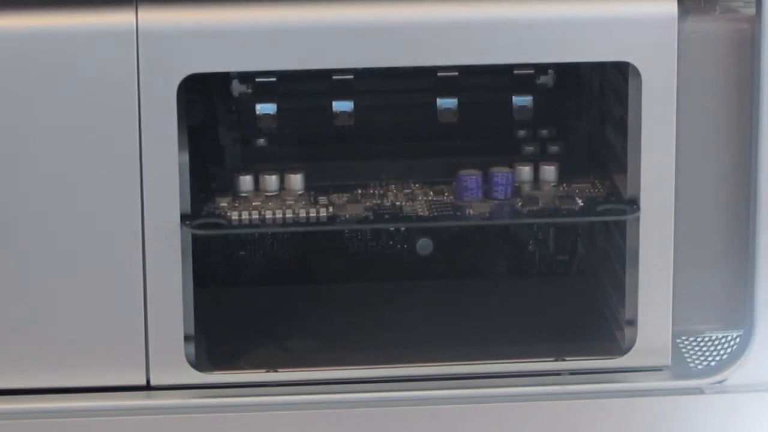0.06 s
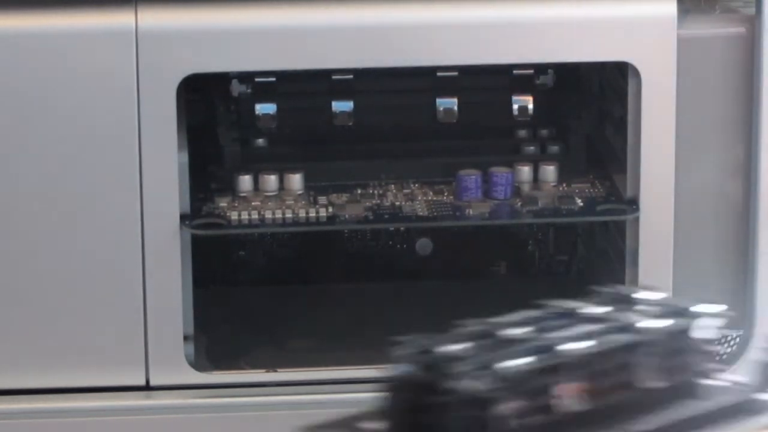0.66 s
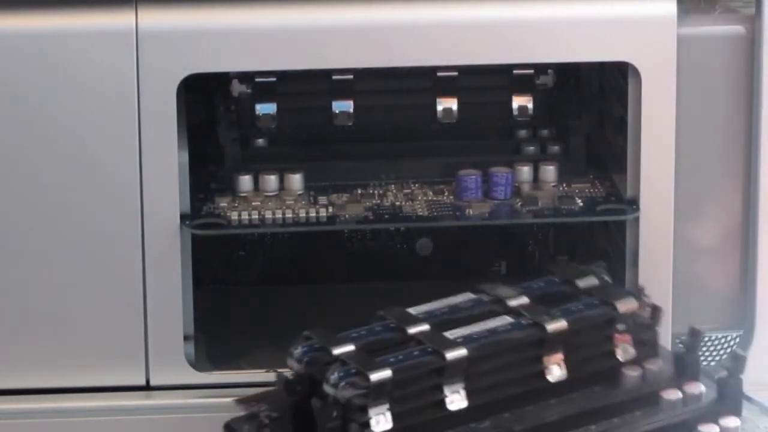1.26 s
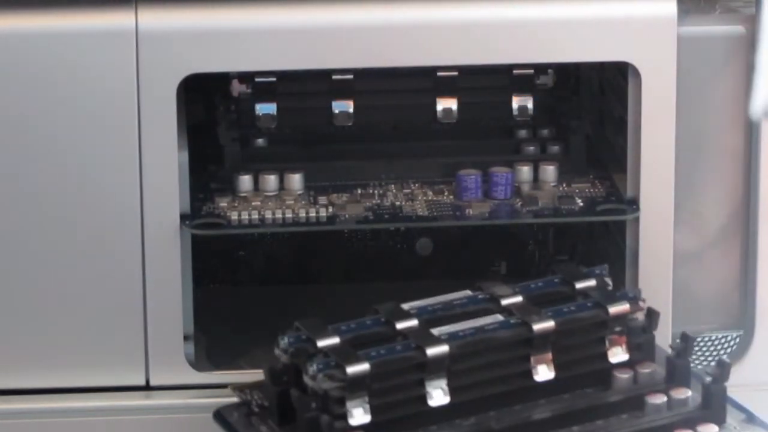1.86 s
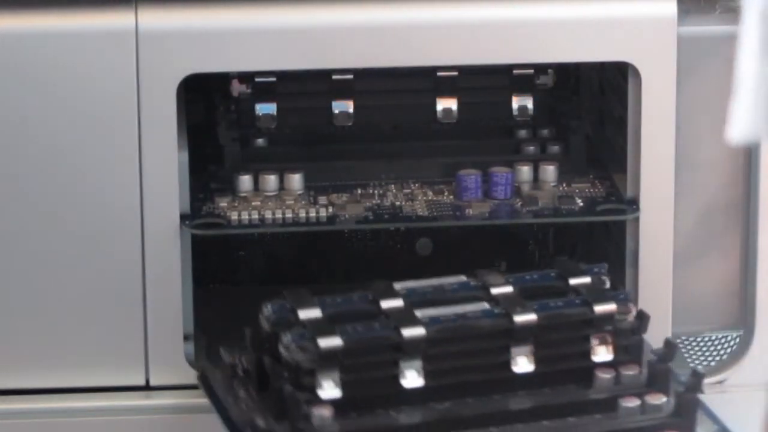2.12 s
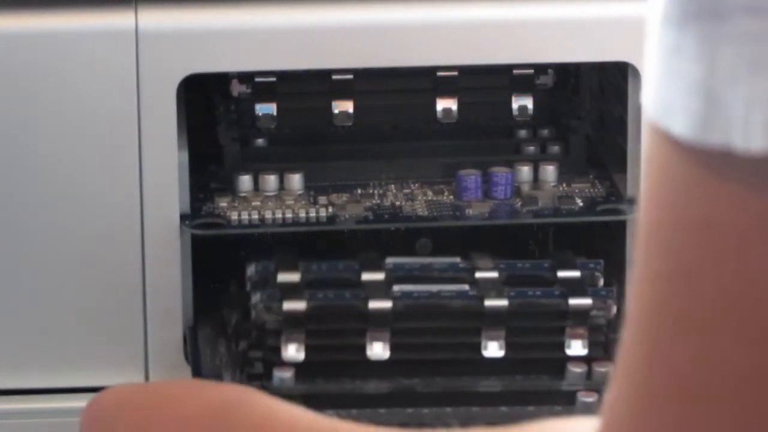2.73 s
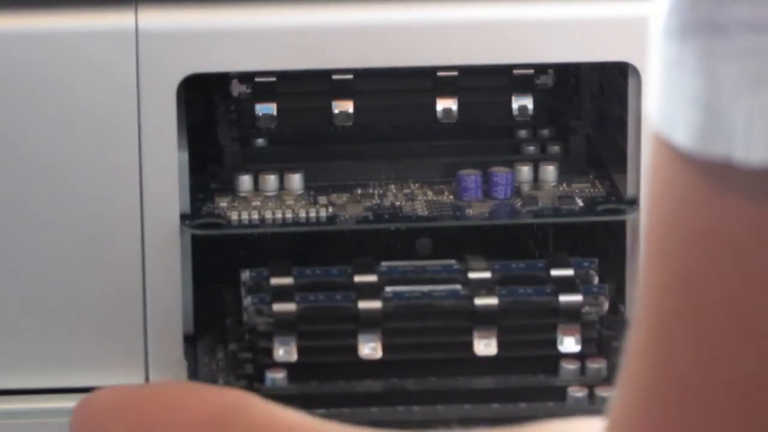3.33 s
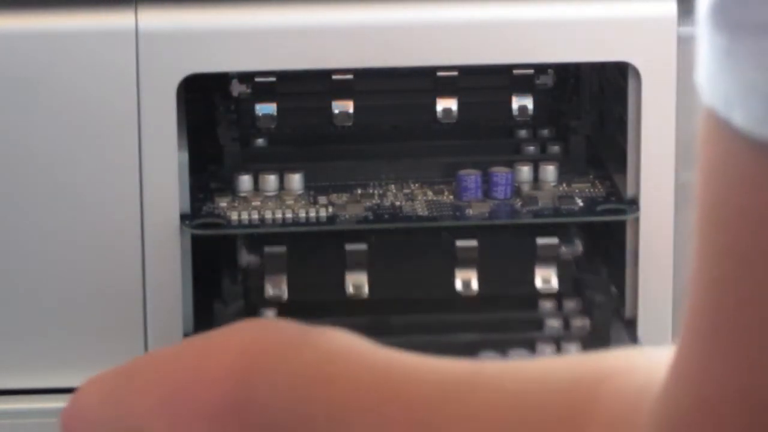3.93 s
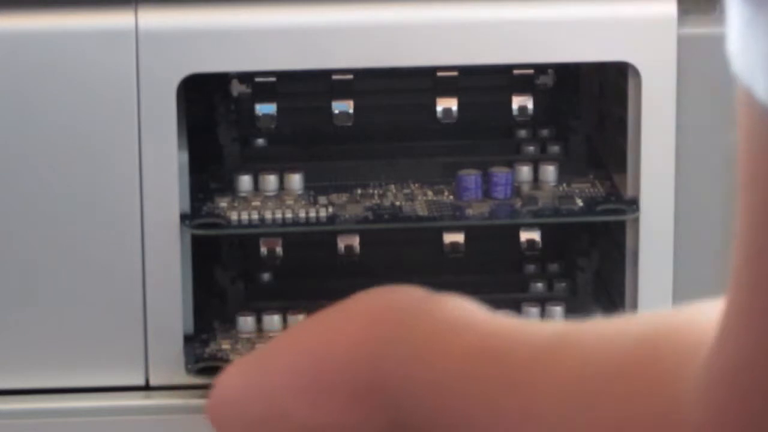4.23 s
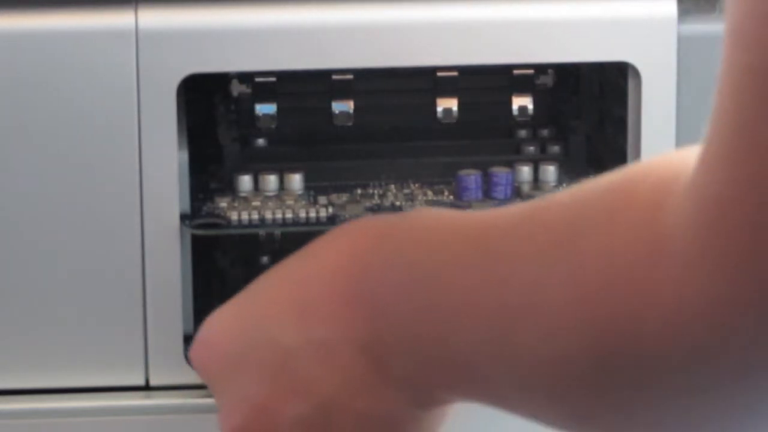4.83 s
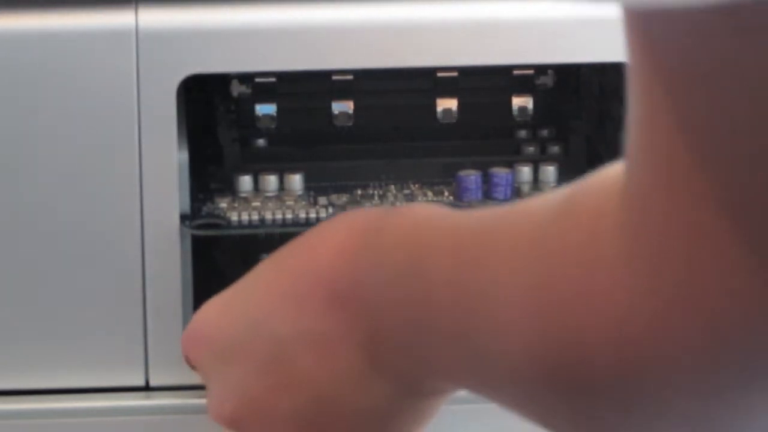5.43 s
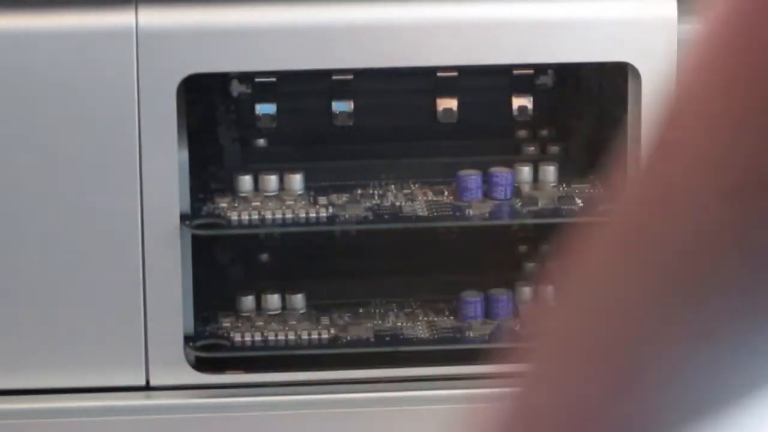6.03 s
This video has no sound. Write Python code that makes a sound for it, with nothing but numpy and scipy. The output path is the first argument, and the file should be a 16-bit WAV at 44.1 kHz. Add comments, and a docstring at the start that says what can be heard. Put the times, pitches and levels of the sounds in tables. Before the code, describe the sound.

Faint bumps and ticks, then firm metallic scrapes and several hard knocks as a memory card slides into a desktop computer, over soft fan noise.

```python
"""Soft room air, a fan's whirr and mains hum come first, then faint scrapes and bumps as a memory riser
card is lifted into the metal cage of a desktop computer. Its steel clips tick, its edge slips over tiny
ridges on the guide rails, firm pushes make the metal sing and squeak, and it seats with heavy knocks.
Board, cage, thin sheet metal, clips and rails ring under every contact, in a small room."""
import sys
import numpy as np
from scipy import signal
from scipy.fft import rfft, irfft, next_fast_len
from scipy.io import wavfile
from scipy.ndimage import map_coordinates

SR = 44100
rng = np.random.default_rng(int(sys.argv[2]) if len(sys.argv) > 2 else 0)


def waveform_to_disk(signal):
    """Save audio, clipped to [-1, 1], as 16-bit WAV at the path in sys.argv[1]."""
    frames = np.transpose(np.atleast_2d(signal))
    scaled = np.clip(frames, -1, 1) * 32767
    samples = np.round(scaled).astype(np.int16)
    wavfile.write(sys.argv[1], SR, samples)


N = 267907

# room tone fader: (time [s], level [dB])
AIR_LEVEL = [(0, -52.5), (.16, -57.5), (2.2, -59.5), (3.5, -61), (4.3, -56), (6.07, -56.5)]
# room tone colour: (frequency [Hz], mid shape [dB], side shape [dB])
AIR_SPECTRUM = [(28, -32, -50), (60, -24.5, -28), (133, -14.5, -14.5), (282, -7.5, -8), (457, -8.5, -9),
                (604, -6.5, -4.5), (623, -8.5, -19), (960, -7.5, -11), (1350, -9, -11), (2940, -18, -23),
                (4230, -25, -33.5), (9200, -26, -34.5), (11900, -33, -38.5), (15100, -36, -49)]
# fan whirr: (pitch [Hz], nominal width [Hz], mid level [dB], side level [dB])
FAN_WHIRR = [(813.7, 25.7, -63.5, -59), (2820, 22, -80, -80)]

# sliding pushes: (full pressure at [s], hold [s], release [s], cage [dB], sheet [dB], clips [dB],
# rail before its lift [dB], edge [dB])
STROKES = [(0.618, .005, 0.036, -70, -55, -68, -65, -85), (0.767, 0.015, 0.032, -52, -46.5, -58, -61, -83),
           (2.812, 0.0067, 0.033, -49.5, -52.5, -59, -58, -69),
           (3.43, 0.05, 0.03, -49.5, -49.5, -58.5, -56, -76),
           (3.9, 0.046, 0.28, -40, -39.5, -68, -49.5, -65), (4.093, 0.023, 0.033, -76, -82, -74, -69, -79),
           (4.439, 0.13, 0.045, -44, -47, -69, -49.5, -65), (4.846, 0.044, .06, -73, -67, -76, -59, -63),
           (5.368, 0.05, 0.033, -40.5, -52, -60, -71, -85),
           (5.836, 0.08, 0.13, -58, -61.5, -71, -69.5, -82),
           (6.045, 0.0073, 0.032, -61, -55, -63, -63, -74)]
# ringing parts: (low [Hz], high [Hz], tail t60 [s], tail [dB], side re tail [dB], quick echoes [dB])
BOARD = (206, 465, 0.32, -1, -30, 4)
CAGE = (470, 1335, 0.315, -4.5, -15.5, -0.5)
SHEET = (1240, 2906, 0.2452, 4, -9, 5)
CLIPS = (3005, 3757, -0.25, 2.5, -15, 13)  # negative t60: this tail swells and cuts off, like a late echo
RAIL = (4598, 12096, 0.33, 1.5, -1, 8.5)
EDGE = (12300, 16500, 0.08, 2, 0, 3)
# resonances of card and cage: (pitch [Hz], width [Hz], peak re the dense bed [dB])
RESONANCES = [(270.3, 9.4, -5), (342, 18, 2.5), (380, 47, 5), (464, 24, 2.5), (522, 22, 9), (577.3, 30, 12),
              (758, 66, 6), (854, 27, 4.5), (946, 20, 7), (1018, 45, 3.5), (1220, 180, 0.5), (1402, 12, 4),
              (1700, 61, 1), (1940, 24, -2), (2140, 13, -13.5), (2560, 72, -6.5), (4720, 2900, 1)]

# the board bumps on opening and guides: (time [s], chatter [s], level [dB], hardness [dB/octave],
# bending re board [dB])
BUMPS = [(1.372, 0.019, -45.5, 0, 0), (1.404, 0.014, -52, -0.5, -4), (1.764, 0.011, -55, 1, 5),
         (1.825, 0.025, -50.5, 1.3, 8.5), (1.862, 0.0082, -66, -1, 1), (2.54, 0.023, -54.5, 0, 7.5),
         (2.765, 0.012, -71.5, -10, 6.5), (2.886, 0.028, -58, 0, 7.5), (3.057, 0.0049, -63, 0, 2.5),
         (3.238, 0.014, -70.5, -6.5, 0.5), (3.866, 0.017, -48, 2, 13.5), (4.858, 0.02, -55, -1, -19),
         (4.982, 0.0049, -75.5, -15, -12), (5.508, 0.0064, -50.5, -6.5, -2.5)]
# steel clips tick on the cage: (time [s], chatter [s], level [dB], hardness [dB/octave])
CLIP_TICKS = [(1.926, 0.016, -60.5, 0), (3.065, 0.0023, -82, 7.5), (3.091, 0.0016, -62.5, -1),
              (3.113, 0.01, -59, -4), (4.695, 0.029, -64.5, 3.5), (5.015, 0.0018, -104, 15),
              (5.133, 0.0015, -62, -1), (5.309, 0.004, -55.5, -3), (5.943, 0.013, -53, -1.5)]
# the card grazes a stop, strikes and rebounds: (time [s], chatter [s], level [dB], hardness [dB/octave],
# board trim [dB], panel re level [dB], graze lead [s], graze level [dB], graze hardness [dB/octave],
# rebound delay [s], rebound re level [dB])
KNOCKS = [(3.7505, 0.0036, -32, -2.5, -10, 8, .0085, -36.5, 2, 0.0165, -3),
          (4.371, 0.0055, -33, -0.5, -22, 2, 0.0085, -37.5, 0.06, .015, -11),
          (4.5445, 0.00036, -23.5, -0.5, 4, -5, 0.0019, -37.5, 2, 0.032, -15.5),
          (5.372, 0.0017, -31, 1, 0, 6, .007, -37, 0, .005, -23),
          (5.4703, 0.0004, -21.5, 2.5, 1, 0.5, 0.018, -36, 2, 0.0054, -17)]
# hit voicings, re the cage: (tilt in a part [dB/octave], board [dB], sheet [dB], clips [dB], rail [dB])
BUMP_MIX = (-2, 2, -2, -8.5, -12)
TICK_MIX = (2.5, -12.5, 2.5, -7, -4)
GRAZE_MIX = (-5.5, -3, -4, -25, -13)
BLOW_MIX = (-3.5, -7, -7, -48, -48)
# trims on the dense ring of a hit: (board [dB], cage [dB], sheet [dB], clips [dB], rail [dB])
PART_TRIM_DB = (-13, -12, -12.5, -18, -13)
# bending modes of the card: (pitch [Hz], t60 [s], trim [dB])
FLEX_MODES = [(153.5, 0.2, -14.5), (266.5, 0.15, 4.5), (384, 0.13, -2.5)]

# the metal sings under firm pushes, and after the knock at 3.75 s and the graze at 5.46 s: # (full strength at
# [s], hold [s], release [s], swell [s], drone [dB], # sheet [dB], rail [dB], rail pitch [Hz], whistle [dB],
# zing [dB])
SINGING_SPELLS = [(3.432, .045, .05, .06, -61, -59, -60, 5000, -71, -56.5),
                  (3.753, .012, .07, .007, -62, -50, -55, 5280, -69, -59.5),
                  (3.92, .045, .1, .05, -47.5, -52, -58.5, 4740, -51.5, -56),
                  (4.44, .1, .025, .05, -44, -53.5, -56.5, 4860, -62, -56),
                  (5.456, .007, .03, .004, -70, -66, -68, 5280, -53, -54)]
# singing modes of panel, sheet and rail: (pitch [Hz], noise width [Hz], trim [dB])
PANEL_DRONE = [(537, 50, -1), (395, 60, -4.5), (797, 60, -7)]
SHEET_RING = [(1432, 30, -1), (1960, 50, -6), (2530, 70, -5), (2675, 60, -1), (2890, 70, -7),
              (3500, 70, -10)]
RAIL_WHISTLE = [(8020, 200, -6), (8700, 150, 0)]
RAIL_ZING = [(10270, 120, 0), (9950, 250, -9)]
# rail modes tuned by each push: (multiple of rail pitch [ratio], noise width [Hz], trim [dB])
RAIL_RING = [(1, 140, 0), (1.12, 220, -5)]
# reverb on singing and bending: (tail t60 [s], tail [dB], side re tail [dB], quick echoes [dB])
SING_REVERB = (0.25, -7, 0, -6)
# a rail squeaks under the long push: (peak at [s], release [s], level [dB], pitch [Hz], jitter [0-1])
SQUEAKS = [(3.94, 0.096, -41, 979, .12), (4.005, 0.06, -34.5, 846, 0.01)]
# dips in the master EQ: (centre [Hz], width [Hz], depth [0-1])
TREBLE_HOLLOWS = [(4110, 700, 0.37), (6570, 1410, 0.59)]

ENTRY_S = (3.3, 4.8)  # the card bends while it enters the guides; after that they hold it
RING_SAMPLES = 24000


def amp(db):
    """Decibels to gain."""
    return 10 ** (np.asarray(db) / 20)


def unit(x):
    """Scale to rms 1."""
    return x / np.sqrt(np.mean(x ** 2) + 1e-20)


def wobble(rate):
    """A smooth random curve, rate knots a second."""
    knots = rng.standard_normal(int(N * rate / SR) + 4)
    return map_coordinates(knots, [np.arange(N) * rate / SR], order=1)


def filtered(x, response):
    """Shape x with a complex frequency response."""
    n = x.shape[-1]
    size = next_fast_len(n + 8192, True)
    return irfft(rfft(x, size) * response(np.fft.rfftfreq(size, 1 / SR)), size)[..., :n]


def resonance(f, hz, width):
    """Response of one damped mode."""
    return 1j * f * width / (hz * hz - f * f + 1j * f * width)


def coloured(hz, db):
    """Noise of rms 1 through an EQ curve."""
    curve = lambda f: amp(np.interp(np.log(f + 1), np.log(hz), db))
    return unit(filtered(rng.standard_normal(N), curve))


def room_tone(side_db=4, hum_hz=100, hum_db=-83):
    """The bed: soft air noise, mains hum and a fan's narrow whirr."""
    t = np.arange(N) / SR
    air = amp(np.interp(t, *np.transpose(AIR_LEVEL)))
    bands, mid_shape, side_shape = np.transpose(AIR_SPECTRUM)
    hum = amp(hum_db) * np.sqrt(2) * np.sin(2 * np.pi * hum_hz * t)
    mid = air * coloured(bands, mid_shape) + hum
    side = air * amp(side_db) * coloured(bands, side_shape)
    for hz, width, fan_mid_db, fan_side_db in FAN_WHIRR:
        whirr = filtered(rng.standard_normal((2, N)), lambda f: resonance(f, hz, width * 2) ** 2)
        mid += amp(fan_mid_db) * unit(whirr[0])
        side += amp(fan_side_db) * unit(whirr[1])
    return np.array([mid + side, mid - side])


def pressure(start, hold, release, swell=0.038):
    """Envelope of a push: up 20 dB per swell time, a hold, then down 20 dB per release time."""
    t = np.arange(N) / SR - start
    return amp(20 * np.minimum(0, np.minimum(t / swell, (hold - t) / release)))


def ringing(force, part):
    """Force rings one part: strong resonances stand on a bed of dense modes."""
    band = signal.butter(3, part[:2], "band", fs=SR, output="sos")
    modes = lambda f: 1 + sum(amp(db) * resonance(f, hz, width) for hz, width, db in RESONANCES)
    return signal.sosfilt(band, filtered(force, modes))


def reverb(part, case_t60=0.02, case_side_db=-15):
    """Stereo response: direct sound, quick echoes in the case, then the tail of case and room."""
    t60, tail_db, side_db, case_db = part[-4:]
    t = np.arange(RING_SAMPLES) / SR
    noise = rng.standard_normal((2, 2, RING_SAMPLES))
    echoes = unit(noise[0] * amp(-60 * t / case_t60) * (1 - np.exp(-t / 0.0025)))
    echoes *= amp([[case_db], [case_db + case_side_db]])
    tail = unit(noise[1] * amp(-60 * t / t60) * (1 - np.exp(-t / 0.002)))
    tail *= amp([[tail_db], [tail_db + side_db]])
    mid, side = (echoes + tail) / np.sqrt(RING_SAMPLES)
    mid[0] += 1
    return np.array([mid + side, mid - side])


def in_case(vibration, part):
    """Send a sustained sound through a reverb of unit energy."""
    response = unit(reverb(part)) / np.sqrt(RING_SAMPLES)
    return signal.fftconvolve(vibration[None], response, axes=1)[:, :N]


def scrapes(slips_per_s=7000, spread_db=3.5, judder_db=2, board_db=-11, rail_lift_db=2, flex_db=4):
    """The card's edge catches on tiny ridges; the slips ring every part, under the singing metal."""
    catches = rng.random(N) < slips_per_s / SR
    slips = catches * rng.standard_normal(N) * amp(spread_db * rng.standard_normal(N))
    slips *= amp(judder_db * wobble(200))
    cage, sheet, clips, rail, edge = sum(amp(levels)[:, None] * pressure(s, hold, release)
                                         for s, hold, release, *levels in STROKES)
    board = cage * amp(board_db)
    t = np.arange(N) / SR
    entering = (t > ENTRY_S[0]) & (t < ENTRY_S[1])
    flex = unit(filtered(slips, lambda f: resonance(f, hz=266, width=11)))
    bending = board * amp(flex_db) * flex * entering
    pushes = ((BOARD, board), (CAGE, cage), (SHEET, sheet), (CLIPS, clips),
              (RAIL, rail * amp(rail_lift_db)), (EDGE, edge))
    rasp = sum(in_case(push * unit(ringing(slips, part)), part) for part, push in pushes)
    return rasp + in_case(bending + singing_metal(), SING_REVERB)


def contact(s, chatter, db, hardness, mix, flex_db=-25, board_db=0, panel_db=-3):
    """Voice a hit: (time [s], chatter [s], tilt [dB/octave], flex [dB], panel [dB], each part [dB])."""
    tilt, board, sheet, clips, rail = mix
    centres = np.sqrt([low * high for low, high, *_ in (BOARD, CAGE, SHEET, CLIPS, RAIL)])
    octaves_above_cage = np.log2(centres / centres[1])
    levels = db + np.array([board + board_db, 0, sheet, clips, rail]) + hardness * octaves_above_cage
    return (s, chatter, tilt + hardness, levels[0] + flex_db, db + panel_db, *levels)


def contact_cues():
    """The hit list: bumps, clip ticks, and the graze, blow and rebound of every knock."""
    hits = [contact(*bump, BUMP_MIX, flex_db) for *bump, flex_db in BUMPS]
    hits += [contact(*tick, TICK_MIX, flex_db=-1) for tick in CLIP_TICKS]
    for s, chatter, db, hardness, board, panel, lead, graze_db, graze_hardness, delay, drop in KNOCKS:
        graze = contact(s - lead, lead, graze_db, graze_hardness, GRAZE_MIX)
        blow = contact(s, chatter, db, hardness, BLOW_MIX, board_db=board, panel_db=panel)
        rebound = contact(s + delay, 0.0024, db + drop, hardness, BLOW_MIX, board_db=board)
        hits += [graze, blow, rebound]
    return hits


def clatter(hits, clean_s=0.0051, corner_hz=120):
    """An impulse plus a chatter of micro-impacts rings the parts; long chatter hides the impulse."""
    t = np.arange(RING_SAMPLES) / SR
    chatter, tilt = np.transpose(hits)[1:3, :, None]
    force = rng.standard_normal((len(hits), RING_SAMPLES))
    force *= np.exp(-t / chatter) * np.sqrt(2 * chatter / SR) / clean_s
    force[:, 0] += 1
    # a hard edge favours the upper modes of every part, a soft one the lower
    force = filtered(force, lambda f: (1 + 1j * f / corner_hz) ** (tilt / (20 * np.log10(2))))
    out = np.zeros((2, N + RING_SAMPLES))
    for k, part in enumerate((BOARD, CAGE, SHEET, CLIPS, RAIL)):
        for (s, _, _, _, _, *levels), ring in zip(hits, ringing(force, part)):
            blow = signal.fftconvolve(ring[None], reverb(part), axes=1)[:, :RING_SAMPLES]
            out[:, round(s * SR):][:, :RING_SAMPLES] += amp(levels[k] + PART_TRIM_DB[k]) * unit(blow)
    return out[:, :N]


def booms(hits, stiff_hz=335, stiff_t60=0.038, panel_hz=579, panel_t60=0.11, lift_db=3, rise_s=0.00065):
    """The body of each hit: the card's bending modes and the cage's main panel swing and die away."""
    t = np.arange(RING_SAMPLES) / SR
    out = np.zeros(N + RING_SAMPLES)
    detunes = 1 + 0.011 * rng.standard_normal((len(hits), len(FLEX_MODES) + 2))
    for (s, chatter, _, flex, panel, board, *_), detune in zip(hits, detunes):
        attack = 1 - np.exp(-t / (chatter / 2 + rise_s))
        modes = [(hz, t60, flex + db) for hz, t60, db in FLEX_MODES]
        modes += [(stiff_hz, stiff_t60, board - 1), (panel_hz, panel_t60, panel + 1)]
        for (hz, t60, db), shift in zip(modes, detune):
            envelope = attack * amp(db + lift_db - 60 * t / t60)
            out[round(s * SR):][:RING_SAMPLES] += envelope * np.sin(2 * np.pi * hz * shift * t)
    return out[:N]


def singing_metal(drift_db=3, pitch_wander=0.005):
    """Each spell of singing, from a firm push or a knock, has its own blend of modes, wavering in pitch and
    level under the moving edge."""
    s, hold, release, swell, drone, sheet, rail, rail_hz, whistle, zing = np.transpose(SINGING_SPELLS)
    pushes = np.array([pressure(*shape) for shape in zip(s, hold, release, swell)])
    # the rail's pitch depends on where the card presses: the strongest push sets it
    rail_pitch = rail_hz[pushes.argmax(axis=0)]
    rail_modes = [(ratio * rail_pitch, width, db) for ratio, width, db in RAIL_RING]
    voices = ((drone, PANEL_DRONE), (sheet, SHEET_RING), (rail, rail_modes),
              (whistle, RAIL_WHISTLE), (zing, RAIL_ZING))
    out = np.zeros(N)
    for levels, modes in voices:
        push = amp(levels) @ pushes
        for hz, width, db in modes:
            flutter = filtered(rng.standard_normal((2, N)), lambda f: (1 + 1j * f / width) ** -3)
            phase = 2 * np.pi * np.cumsum(hz * (1 + pitch_wander * wobble(25))) / SR
            tone = unit(flutter[0] * np.cos(phase) + flutter[1] * np.sin(phase))
            out += push * amp(db + drift_db * wobble(25)) * tone
    return out


def rail_squeak(rough_db=1.5):
    """For a moment the slips lock together, first into a rasp, then into an unsteady tone."""
    out = np.zeros(N)
    for s, release, db, hz, jitter in SQUEAKS:
        phase = 2 * np.pi * np.cumsum(hz * (1 + jitter * wobble(400))) / SR
        envelope = amp(db + rough_db * wobble(90)) * pressure(s, 0, release)
        out += envelope * np.sqrt(2) * np.sin(phase)
    return out


def scene(card_pan_db=0.37, room_pan_db=0.42, low_cut_hz=115):
    """The mix: the card up close over the room tone, both just right of centre."""
    hits = contact_cues()
    card = clatter(hits) + booms(hits) + scrapes() + rail_squeak()
    # small panels radiate no deep bass
    card = signal.sosfilt(signal.butter(4, low_cut_hz, "high", fs=SR, output="sos"), card)
    room = room_tone()
    return card * amp([[-card_pan_db], [card_pan_db]]) + room * amp([[-room_pan_db], [room_pan_db]])


def record(dry, rolloff_hz=14400, top_hz=15800):
    """Master EQ: two treble hollows, a steep roll-off and a hard ceiling on the highs."""
    hollows = lambda f: 1 - sum(depth * resonance(f, hz, width) for hz, width, depth in TREBLE_HOLLOWS)
    high_cut = lambda f: (f < top_hz) / np.sqrt(1 + (f / rolloff_hz) ** 12)
    return filtered(dry, lambda f: hollows(f) * high_cut(f))


dry = scene()
out = record(dry)
waveform_to_disk(out)
```